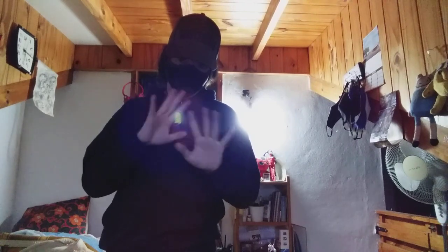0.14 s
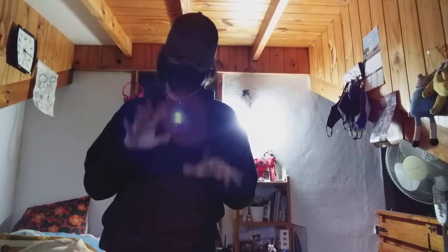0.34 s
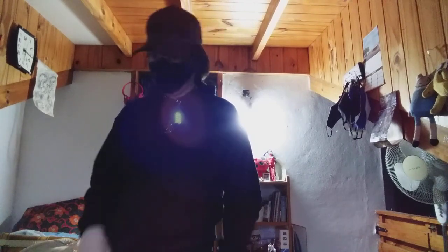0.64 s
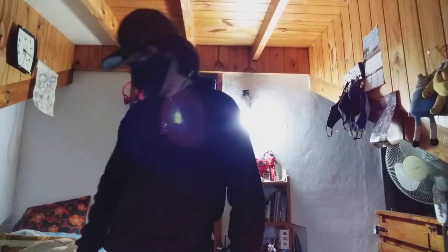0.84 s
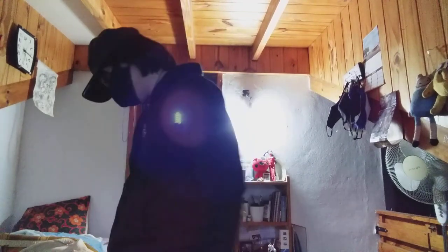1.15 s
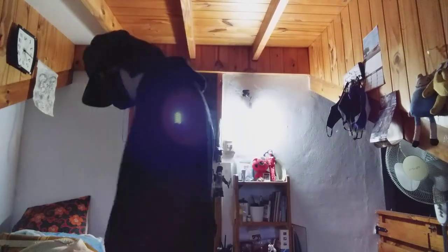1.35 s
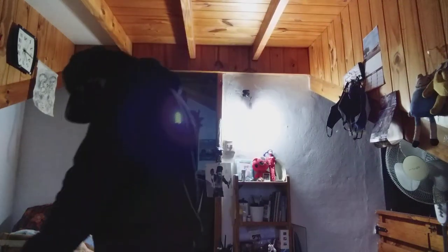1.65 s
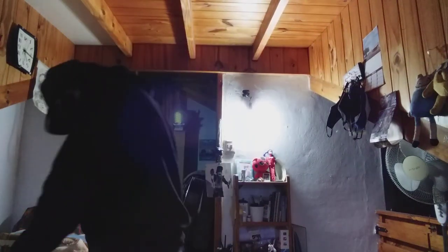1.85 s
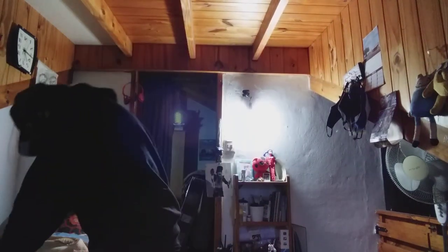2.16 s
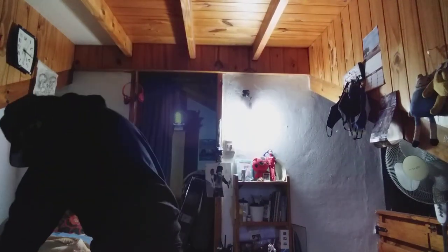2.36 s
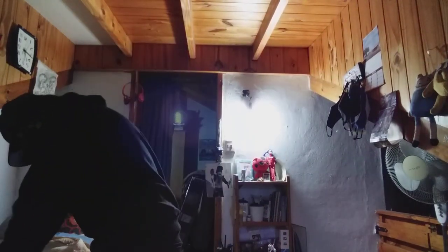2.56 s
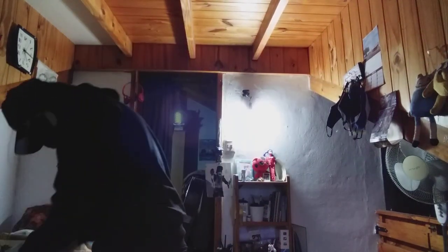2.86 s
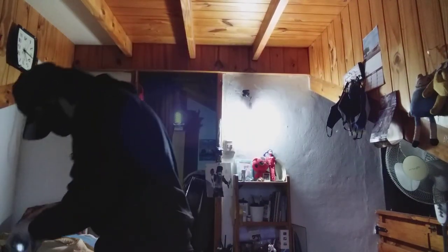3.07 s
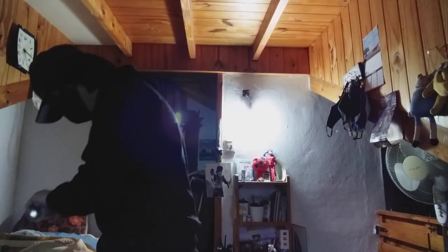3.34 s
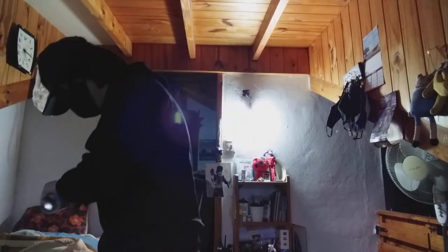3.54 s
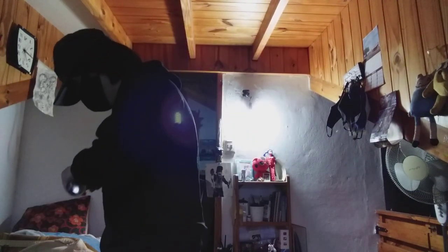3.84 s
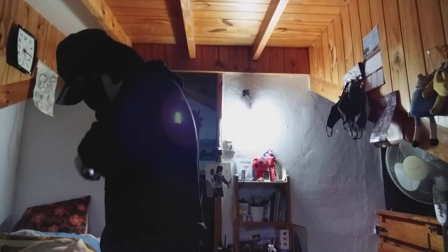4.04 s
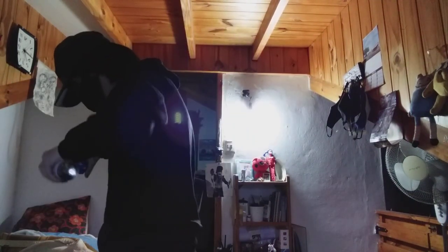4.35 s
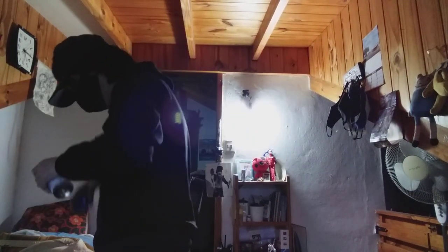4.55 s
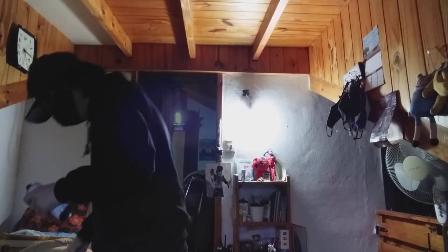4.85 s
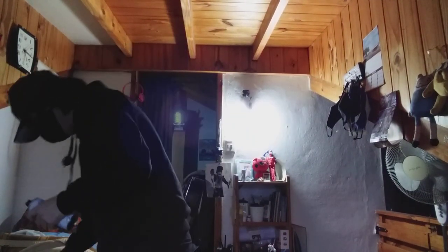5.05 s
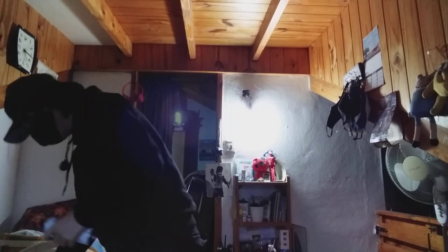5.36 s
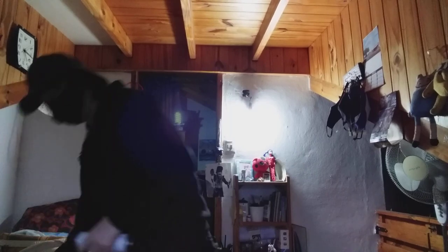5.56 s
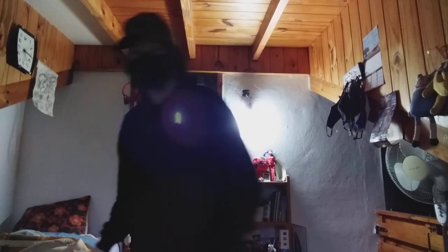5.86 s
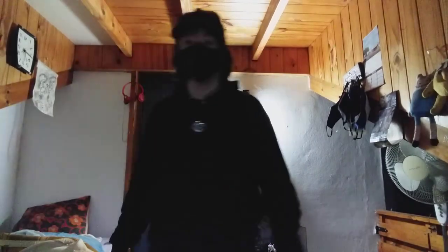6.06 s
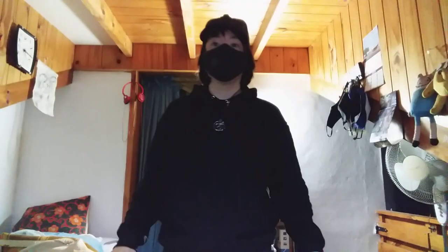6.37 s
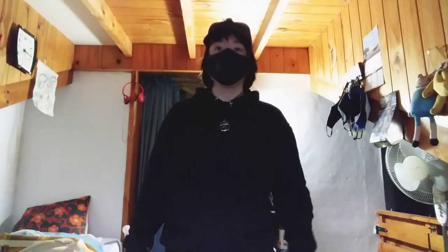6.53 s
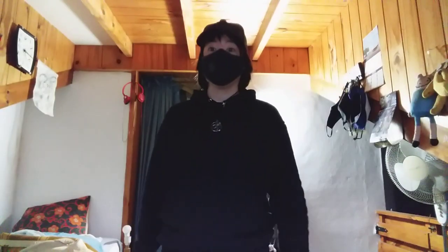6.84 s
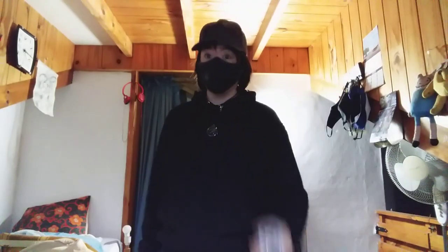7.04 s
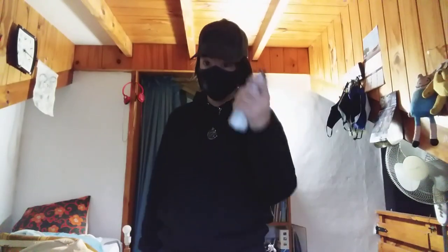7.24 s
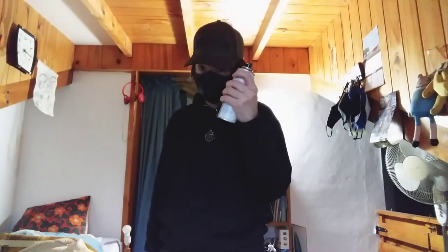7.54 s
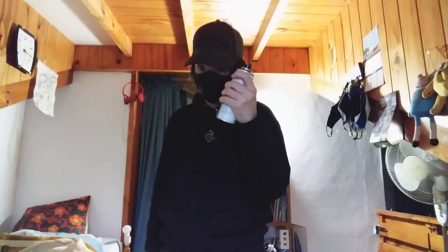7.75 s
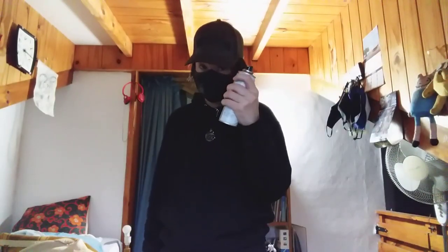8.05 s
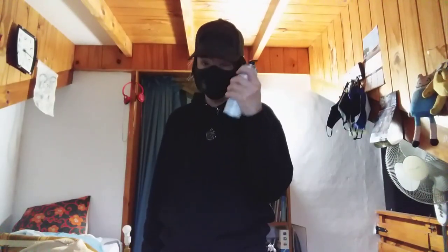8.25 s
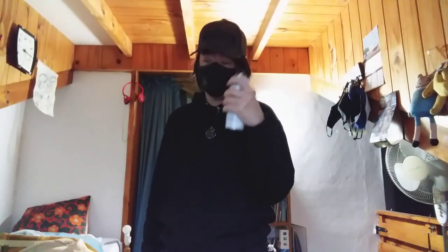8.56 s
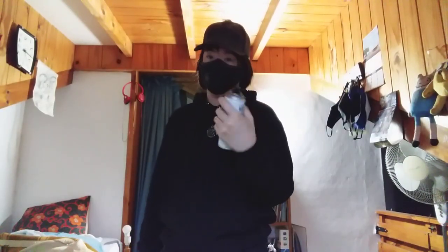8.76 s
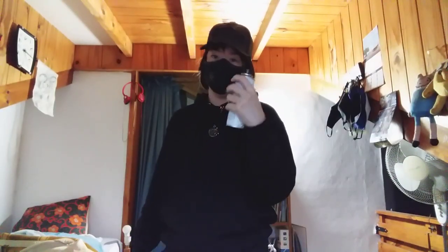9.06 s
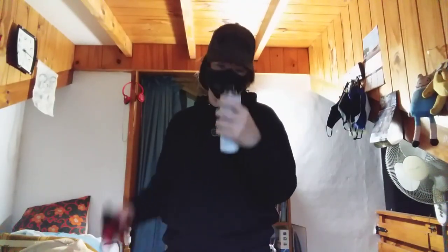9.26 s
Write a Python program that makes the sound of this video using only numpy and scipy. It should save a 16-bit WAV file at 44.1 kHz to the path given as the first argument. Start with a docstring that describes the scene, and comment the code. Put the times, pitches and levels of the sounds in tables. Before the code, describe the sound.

A small, quiet wooden room with faint low rumble, drone and thin hiss. From 0.2 to 2.6 seconds there are only very soft sleeve rustles; from about 1.5 to 3.7 a bird outside gives faint chips, slurred whistles and falling notes, blurred by echoes. At 2.7 a ball begins to tick and roll inside a metal spray-paint can, with brighter taps at 3.3 and lighter ones to 3.9. At 4.2 the can knocks dully on wood amid a loud, sharp burst of clacks, then smaller hollow rattles roll away until 5.0. Near quiet follows, with a tiny rustle at 5.5. At 5.9 a hard clatter starts, continuing as uneven, bright steel rattling with gritty rolling and hollow hum, lively around 7.2 and changing to a lower hollow colour before stopping near 8.0. Faint ticks at 8.5 to 9.0 and soft cloth movements close it.

```python
"""A mixing ball strikes, bounces and rolls in a spray-paint can shaken in bursts in a small, quiet wooden room.
Strikes are noise bursts shaped by shell and gas-space resonances; rolling is gritty noise plus a gas-space hum.
The can knocks once on wood (decaying modes), a sleeve rustles (filtered grains), a bird sings outside (gliding
sines with echoes), a narrow band near 770 Hz swells twice, and rumble, drone and hiss lie underneath."""
import sys
import numpy as np
from scipy import signal
from scipy.fft import rfft, irfft, next_fast_len
from scipy.io import wavfile
from scipy.ndimage import uniform_filter1d, map_coordinates

SR = 44100
rng = np.random.default_rng(int(sys.argv[2]) if len(sys.argv) > 2 else 0)


def log_audio(samples):
    """Write samples as a 16-bit WAV file to the path given in sys.argv[1]."""
    # one column per channel
    frames = np.atleast_2d(samples).T
    # limit to full scale, then quantise
    limited = np.clip(frames, -1, 1)
    pcm = np.round(limited * 32767).astype(np.int16)
    wavfile.write(sys.argv[1], SR, pcm)


N = 414540  # samples

# Ball strikes: start_s, relative_level_db, gas_pitch_hz, gas_ring_db, shell_ring_db, rattle_t60_s
BALL_STRIKES = [(2.6832, -24.5, 2150, -17.5, -9, 0.2), (2.7332, -21.5, 1960, -20, -4.5, 0.15),
                (2.7899, -37.5, 2240, 9.5, -27, 0.17), (2.8374, -34.5, 2250, 1, -26, 0.11),
                (2.8729, -33, 2230, -8.5, -13, 0.17), (2.9125, -44, 2240, -20, -16, 0.19),
                (2.9832, -45, 2250, -2.5, -30, 0.19), (3.2711, -17, 2420, -12.5, -28, 0.14),
                (3.3087, -28.5, 2070, -7, -10, 0.21), (3.3266, -16, 2590, -10, -30, 0.11),
                (3.3685, -25.5, 1960, -16, -27, 0.19), (3.7657, -36, 1890, 1, -15, 0.195),
                (3.8081, -25.5, 1750, -10.5, -23.5, 0.19), (3.906, -54, 1090, -29, -34.5, 0.19),
                (3.9376, -41, 1240, -10.5, -29, 0.18), (4.2352, -16.5, 1260, -18, -16, 0.13),
                (4.2931, -14.5, 1250, -11.5, -11, 0.17), (4.3161, 0, 2700, -25, -7, 0.15),
                (4.3224, -12.5, 1140, -24.5, -15, 0.19), (4.3277, -8, 2180, -21, -13.5, 0.22),
                (4.342, -10.5, 1140, -7.5, -13.5, 0.14), (4.3974, -8, 1380, -6, -15, 0.13),
                (4.444, -18, 1320, -14.5, -16, 0.21), (4.597, -24.5, 1750, -13, -7.5, 0.16),
                (4.6304, -29, 1810, -8.5, -20, 0.18), (4.6622, -37, 1780, -14.5, -8, 0.164),
                (4.6913, -23, 1770, -5, -33, 0.12), (4.7729, -25, 1800, -23, -22, 0.22),
                (4.8343, -27.5, 1820, -14.5, -31, 0.19), (4.8676, -27.5, 1810, -7.5, -20, 0.19),
                (4.9088, -43.5, 1810, -17, -7, 0.192), (4.9486, -29, 1840, -11.5, -24, 0.15),
                (4.974, -33, 1830, -3.5, -24, 0.24), (5.4436, -48.5, 1290, -8, -25.5, 0.26),
                (5.6715, -34, 1060, -11.5, -17, 0.12), (5.7535, -55, 1060, -10, -13.5, 0.19),
                (5.9374, -8, 1910, -13.5, -3, 0.11), (5.9424, -4, 1950, -26.5, -8, 0.14),
                (5.9471, -5, 2140, -13.5, 0, 0.12), (5.96, -22, 2040, -22.5, -12.5, 0.21),
                (6.0009, -21.5, 1970, -3.5, -22.5, 0.2), (6.0424, -19, 2320, -19, -7, 0.22),
                (6.0621, -10.5, 2060, -23.5, -12, 0.16), (6.101, -14, 2060, -18.5, -19.5, 0.16),
                (6.124, -23.5, 1950, -9.5, -26, 0.1), (6.2449, -28, 1910, -18.5, -10, 0.24),
                (6.4048, -21.5, 1910, -11.5, 1, 0.26), (6.4318, -20, 2060, -13, -15, 0.25),
                (6.4717, -10.5, 2500, -38, -14.5, 0.17), (6.5186, -22, 1780, -31, -8.5, 0.13),
                (6.6371, -24.5, 1680, -39, -6, 0.27), (6.6807, -35.5, 1550, -8, -15, 0.19),
                (6.6956, -18.5, 1710, -14.5, -2, 0.25), (6.7451, -15, 1910, -13.5, -10.5, 0.15),
                (6.7845, -19, 1910, -23, -8, 0.17), (6.8043, -15.5, 1680, -16.5, -16.5, 0.34),
                (6.8654, -27.5, 1710, -12, -24, 0.14), (6.9112, -34, 1580, -1.5, -8.5, 0.19),
                (6.9927, -39.5, 1510, -14.5, -24, 0.32), (7.0494, -14.5, 2140, -12, -5.5, 0.34),
                (7.0671, -13.5, 2170, -13, -8.5, 0.28), (7.1967, -9, 2600, -29, -3, 0.15),
                (7.2149, -24, 2090, -4, -17, 0.19), (7.2295, -15, 2030, -16, -8, 0.2),
                (7.2352, -24, 1980, -11.5, -1.5, 0.19), (7.2633, -10, 2570, -28, -10.5, 0.19),
                (7.2903, -26, 1730, -12, -26, 0.21), (7.323, -27.5, 2020, -19.5, -28, 0.1),
                (7.3413, -26, 2120, -11.5, -27, 0.28), (7.3692, -14, 1210, -17.5, -23.5, 0.13),
                (7.398, -24, 1330, -16.5, -17, 0.084), (7.429, -30, 1250, -7, -7, 0.16),
                (7.5453, -13, 1980, -15, -8.5, 0.14), (7.5557, -22, 1170, -9, -14, 0.15),
                (7.601, -27, 1050, -16, -4.5, 0.16), (7.6505, -21, 1050, -15.5, -34, 0.11),
                (7.6975, -21.5, 2480, -9, -30, 0.17), (7.7109, -19.5, 1000, -8.5, -21.5, 0.16),
                (7.7314, -27.5, 1060, -11, -13, 0.21), (7.7533, -28.5, 2440, -5, -24, 0.14),
                (7.7912, -36, 2530, -7.5, -30, 0.175), (7.8216, -17.5, 1280, -15, -30, 0.19),
                (7.8394, -15, 1250, -20.5, -18, 0.11), (7.8724, -18.5, 1240, -20.5, -41, 0.22),
                (7.9079, -30, 1120, -14.5, -37, 0.19), (7.9449, -27, 2040, -21, -18.5, 0.2),
                (7.9726, -36.5, 2490, -11, -18, 0.22), (8.4503, -59, 1030, -19, -8, 0.19),
                (8.509, -36.5, 1060, -5.5, -3, 0.216), (8.5485, -31.5, 1280, -12, -23, 0.24),
                (8.5686, -39, 2550, -10.5, -12.5, 0.177), (8.761, -53.5, 1190, -31, -8, 0.43),
                (8.962, -63.5, 1170, 1.5, -8, 0.32)]
# Hold on the can, from each time on: start_s, thud_db (for a middling blow), wall_db, dome_db, treble_db, gas_width_hz
CAN_GRIPS = [(2.6, -27, -6.5, -30, -35.5, 250), (2.78, -13, -7, -11.5, -19.5, 200),
             (3.2, -16.5, -17, -19, -22, 400), (3.7, -17, -12, -14, -14, 298),
             (4.2, -16, -11, -18.5, -23.5, 220), (4.55, -14, -5.5, -11.5, -15.5, 270),
             (5.4, -33.5, -6, -27, -50, 592), (5.9, -22.5, -13.5, -14.5, -23.5, 272),
             (6.35, -36, -15.5, -21, -41, 268), (6.6, -30, -12, -9.5, -24.5, 355),
             (7.02, -25, -13, -18.5, -19.5, 250), (7.19, -26, -9, -14.5, -25.5, 300),
             (7.36, -34, -15, -16.5, -26, 513), (7.52, -12.5, -11, -29, -20, 1200),
             (7.63, -24, -13, -41, -18.5, 1220), (7.81, -27, -13, -29, -22, 1000),
             (8.4, -42, -6, -20.5, -16, 602), (8.7, -40.5, -33, 5, -11.5, 498),
             (8.9, -21, -14, -20.5, -30, 500)]
# Shell wall modes: pitch_hz, width_hz, gain_db
SHELL_MODES = [(5400, 600, 2), (5780, 300, 5), (6410, 380, -6.5)]
# Bright treble of the strikes and rolling: frequency_hz, gain_db
TREBLE_COLOUR = [(5060, -27), (8600, -14), (9130, -25), (9910, -5.5), (11900, 6.5), (13700, -6.5),
                 (15100, -2.5), (15600, -4.5)]
# Steel clack: frequency_hz, gain_db
BODY_COLOUR = [(180, -48), (300, -1.5), (535, -30), (696, -36), (953, 4.5), (2830, 6), (4490, -20.5),
               (7140, 6), (8420, -18.5), (12700, -28), (15500, -23.5)]
MIDDLING_DB = -21.5  # relative_level_db of a middling blow
THUD_LAG_DB_PER_DB = 0.61  # thud drop per dB of harder blow
SCATTER_DB = 3  # random colour spread from strike to strike
CRACK_DB, CHATTER_DB = 3, -5.5  # first contact, rattle after it
CRACK_T60_S = 0.0025
STRAY_BOUNCES_PER_S = 70


def can_response(f, thud_db, gas_hz, gas_db, gas_width_hz, wall_db, shell_db, dome_db, treble_db, luck):
    """Can as a minimum-phase filter: power sum of clack, thud, gas, wall, shell, dome and treble."""
    parts = [
        amp(-18.5) * along(BODY_COLOUR, f),
        amp(thud_db + 15) * resonance(f, 940, 1200) ** 2,
        amp(gas_db + 17.5) * resonance(f, gas_hz, gas_width_hz),
        amp(wall_db + 9) * resonance(f, 3700, 2800) ** 2,
        amp(shell_db + 12.5) * modes(f, SHELL_MODES),
        amp(dome_db + 14) * resonance(f, 7400, 900) ** 2,
        amp(treble_db + 8) * along(TREBLE_COLOUR, f),
    ]
    power = sum(np.abs(part) ** 2 for part in parts)
    ripple_db = 3.5 * np.array([np.interp(f, np.linspace(0, SR / 2, len(row)), row) for row in luck])
    return causal(np.sqrt(power) * amp(ripple_db))


def strikes():
    """Each blow is a sharp crack, then chatter and room answer dying away, coloured by the can."""
    start_s, level_db, gas_hz, gas_db, shell_db, t60_s = np.transpose(BALL_STRIKES)[:, :, None]
    grips = np.array(CAN_GRIPS)
    grip = grips[np.searchsorted(grips[:, 0], start_s[:, 0]) - 1]
    scatter_db = SCATTER_DB * rng.standard_normal((len(start_s), 4))
    thud_db, wall_db, dome_db, treble_db = (grip[:, 1:5] + scatter_db).T[:, :, None]
    thud_db = thud_db - THUD_LAG_DB_PER_DB * (level_db - MIDDLING_DB)
    gas_width_hz = grip[:, 5:]

    t = np.arange(int(0.3 * SR)) / SR
    shape = (len(start_s), len(t))
    click = (t == 0) * 4
    crack = (rng.standard_normal(shape) * 0.3 + click) * amp(CRACK_DB - 60 * t / CRACK_T60_S)

    dying = amp(-60 * t / np.clip(t60_s, 0.03, 0.6)) + 0.4 * amp(-60 * t / 0.02)
    # stray bounces stand out of the dense chatter
    bounces = (rng.random(shape) < STRAY_BOUNCES_PER_S / SR) * rng.normal(0, 6, shape)
    chatter = (gritty(shape, spike_db=-1) + bounces) * amp(CHATTER_DB) * dying

    luck = rng.standard_normal((len(start_s), 80))  # each blow wakes the small wall modes at new strengths

    def can(f):
        """This set of blows through the can."""
        return can_response(f, thud_db, gas_hz, gas_db, gas_width_hz, wall_db, shell_db, dome_db, treble_db, luck)

    hits = amp(level_db - 6.5) * filtered(crack + chatter, can)
    out = np.zeros(N + len(t))
    for start, hit in zip(np.round(start_s[:, 0] * SR).astype(int), hits):
        out[start:start + len(t)] += hit
    return out[:N]


# Ball rolling in paint, one list per spell: time_s, scrape_db, hum_over_scrape_db, hum_pitch_hz
ROLL_SPELLS = [
    [(2.66, -74, -3, 2176), (2.72, -49, 0, 2150), (2.8, -54.5, -1, 2220), (3.0, -55, 5, 2218),
     (3.06, -69.5, 0, 2158), (3.24, -61, -7, 2221), (3.4, -56.5, -45, 2061), (3.5, -66, 9, 2162)],
    [(3.5, -63.5, 0, 2140), (3.72, -70, -4, 2155), (3.82, -56.5, 18.5, 1744), (3.96, -63, -25, 1300),
     (4.02, -81, -10, 1311), (4.15, -94, -9, 1247)],
    [(4.22, -86, -1, 1236), (4.3, -71, -3, 1238), (4.36, -44, 6.5, 1200), (4.41, -38, 7.5, 1400),
     (4.45, -44, 0, 1320), (4.5, -50, -1.5, 1689), (4.6, -63, 4, 1701), (4.7, -58, 24.5, 1800),
     (4.79, -64, -13, 1772), (4.88, -49, 10.5, 1804), (4.98, -61, -12.5, 1773), (5.055, -60, -12, 1710),
     (5.11, -77.5, -7.5, 1700)],
    [(5.4, -91.5, -6, 1311), (5.47, -65.5, 15, 1281), (5.51, -73.5, -1.5, 1208), (5.64, -68, 5, 1100),
     (5.74, -68, -4, 1095), (5.8, -62, -10, 1950), (5.92, -60, 5.5, 1969), (6.0, -47.5, -11, 2040),
     (6.12, -41, 3.5, 1988), (6.24, -52.5, -9.5, 1884), (6.34, -64, -1, 1958), (6.46, -56.5, -10, 2000),
     (6.54, -53, -22, 1837), (6.62, -75.5, -1, 1600)],
    [(6.62, -70.5, -5, 1595), (6.67, -53, 4.5, 1611), (6.74, -58.5, 9, 1890), (6.83, -37.5, -2.5, 1760),
     (6.93, -52.5, 11.5, 1570), (7.02, -53, -15, 1700), (7.07, -46.5, 10, 2166), (7.13, -42.5, -3, 2296),
     (7.19, -56, -4, 2050), (7.3, -57, -4, 2000), (7.45, -53.5, 7, 1270), (7.52, -69.5, -6, 1270)],
    [(7.52, -57.5, -13, 1270), (7.58, -34, -8, 1223), (7.64, -66, -2, 1150), (7.73, -44.5, -25, 1150),
     (7.8, -89, -10, 1200), (7.88, -48.5, -17, 1180), (8.025, -56.5, -3, 1224), (8.08, -83.5, -10, 1200),
     (8.3, -85, -4.5, 1200), (8.7, -88.5, -20, 1200)],
]
# Scrape on the wall: frequency_hz, gain_db
SCRAPE_COLOUR = [(290, -30), (500, -7), (671, -14), (1090, -6), (1210, -17.5), (2000, -11), (3170, -11),
                 (7380, -10.5), (8300, -25.5), (10800, -83), (18300, -120)]
TREBLE_DB = -15  # treble over scrape
TICKS_PER_S, TICK_DB, TICK_T60_S = 67, -8.5, 0.02  # ball skips; level over the grit


def roll():
    """The rolling ball scrapes the wall, a bright treble layer joins, the gas space hums at its moving pitch."""
    speed, hum_db = np.zeros(N), np.zeros(N)
    for spell in ROLL_SPELLS:
        speed += amp(curves(spell, silent=-120)[0])
        hum_db += curves(spell, silent=0)[1]
    gas_hz = curves(np.concatenate(ROLL_SPELLS))[2]

    skips = (rng.random(N) < TICKS_PER_S / SR) * amp(rng.normal(0, 5, N))
    tick = amp(-60 * np.arange(SR // 20) / SR / TICK_T60_S)
    skipping = unit(np.convolve(skips, tick)[:N])
    grit = patchy(gritty(N, spike_db=4) * (1 + amp(TICK_DB) * skipping), depth_db=2.8)
    scrape = unit(filtered(grit, lambda f: along(SCRAPE_COLOUR, f) + amp(-24.5) * abs(modes(f, SHELL_MODES))))
    treble = unit(filtered(grit, lambda f: along(TREBLE_COLOUR, f)))

    # slow noise on both quadratures makes a narrow band around the gas pitch
    flutter = filtered(rng.standard_normal((2, N)), lambda f: 1 / (1 + (f / 165) ** 2))
    phase = 2 * np.pi * np.cumsum(gas_hz) / SR
    tone = flutter[0] * np.cos(phase) + flutter[1] * np.sin(phase)
    hum = unit(tone * (1 + skipping))

    bumps_db = 1.8 * wobble(30)  # uneven wall contact
    return amp(bumps_db) * speed * (scrape + amp(TREBLE_DB) * treble + amp(hum_db) * hum)


# Can on wood: start_s, level_db
WOOD_KNOCK = (4.2335, -16)
# Wood modes: pitch_hz, relative_level_db, t60_s
WOOD_MODES = [(190, -7, 0.1), (388, -10, 0.15), (501, -4, 0.092), (766, -15, .07), (1280, -20.5, 0.037)]


def knock():
    """The can's base knocks wood: short modes in a dull puff."""
    start_s, level_db = WOOD_KNOCK
    t = np.arange(SR // 4) / SR
    ring = sum(amp(db - 60 * t / t60_s) * np.sin(2 * np.pi * hz * t) for hz, db, t60_s in WOOD_MODES)
    dull = unit(filtered(rng.standard_normal(len(t)), lambda f: resonance(f, 450, 650) ** 2))
    puff = dull * amp(-2.5 - 60 * t / 0.11)
    onset = 1 - np.exp(-t / 0.003)
    out = np.zeros(N)
    out[round(start_s * SR):][:len(t)] = amp(level_db) * (ring + puff) * onset
    return out


# Sleeve movements: start_s, length_s, swish_db, scuff_db
SLEEVE_MOVES = [(.17, 0.074, -76, -78), (0.625, 0.26, -77.5, -89), (0.856, .06, -77, -85),
                (0.952, 0.24, -81.5, -96), (1.205, .07, -69.5, -70), (1.308, 0.094, -72, -73.5),
                (1.673, 0.069, -80, -84), (1.91, 0.04, -80, -70.5), (2.01, 0.042, -75, -92),
                (2.28, 0.13, -70.5, -93), (2.469, 0.14, -68, -77), (5.124, 0.034, -86, -89),
                (5.198, 0.027, -78, -97.5), (5.32, 0.041, -79.5, -80.5), (5.531, 0.023, -60, -57.5),
                (8.02, 0.24, -87.5, -92), (8.193, 0.049, -76.5, -84), (8.32, .1, -78.5, -89.5),
                (8.44, 0.055, -76.5, -77), (8.748, 0.077, -82.5, -86.5), (8.948, 0.043, -74, -74),
                (9.054, 0.25, -82.5, -90), (9.352, 0.064, -76.5, -72.5)]
# Bright swish: frequency_hz, gain_db
SWISH_COLOUR = [(1350, -39), (2300, -27.5), (2560, -31), (2720, -11.5), (3230, -21), (4060, -10.5),
                (5580, -18), (6910, -14), (7780, -17), (8300, -53), (10800, -83), (18300, -120)]
# Duller scuff: frequency_hz, gain_db
SCUFF_COLOUR = [(400, -12), (650, -7), (800, -8.5), (1150, -6), (1700, -6), (2600, -13.5), (4000, -46)]
RUSTLE_ATTACK_S, RUSTLE_RELEASE_S = 0.017, 0.053


def sleeve():
    """Soft cloth friction as the arm moves: a bright swish over a duller scuff, from the same grains."""
    swish_level, scuff_level = np.zeros(N), np.zeros(N)
    for start_s, length_s, swish_db, scuff_db in SLEEVE_MOVES:
        move = gesture(start_s, length_s, RUSTLE_ATTACK_S, RUSTLE_RELEASE_S)
        swish_level += amp(swish_db) * move
        scuff_level += amp(scuff_db) * move
    fibres = patchy(gritty(N, spike_db=2.5), depth_db=1.8)
    swish = unit(filtered(fibres, lambda f: along(SWISH_COLOUR, f)))
    scuff = unit(filtered(fibres, lambda f: along(SCUFF_COLOUR, f)))
    return swish_level * swish + scuff_level * scuff


# Chip shape, a fall then a peak: after_start_s, pitch_hz, relative_level_db
CHIP_SHAPE = [(0, 4717, -16), (.006, 2946, 5.5), (.012, 2570, -6), (0.015, 3120, 8.5), (0.023, 4020, 2.5),
              (.026, 2843, 7.5), (.04, 2380, -1.5), (.067, 2615, -24)]
# Chips sung: start_s, relative_level_db
CHIPS_SUNG = [(1.672, -55), (2.005, -50.5), (2.349, -52)]
# Long note shapes: length_share, base_pitch_hz, relative_level_db
SLUR_SHAPE = [(0, 2682, -17), (.14, 2870, -6), (.4, 2145, -7.5), (.54, 2330, -15), (.66, 2500, 2),
              (.8, 2482, -19), (1, 2460, -28)]
FALL_SHAPE = [(0, 5550, -23), (.3, 5100, -7), (.62, 4550, 6), (.85, 4200, -10), (1, 4000, -28)]
LOW_SHAPE = [(0, 2150, -15), (.6, 2166, 4.5), (1, 2200, -29)]
# Long notes sung: start_s, length_s, pitch_ratio, relative_level_db
SLURS_SUNG = [(1.45, .17, .92, -62.5), (1.771, 0.17, 1.015, -50), (2.109, 0.17, .99, -50),
              (2.447, 0.18, 0.99, -49)]
FALLS_SUNG = [(2.767, 0.042, .99, -51.5), (2.883, .07, 0.98, -46.5), (3.011, .066, 1.01, -48.5),
              (3.14, 0.087, 1.01, -47.5)]
LOWS_SUNG = [(3.11, 0.15, 1.01, -57), (3.499, 0.088, 0.97, -53.5), (3.63, .12, 1.01, -55.5)]


def bird():
    """Whistles with a flutter, blurred by echoes outside."""
    chips = [np.array(CHIP_SHAPE) + [start_s, 0, db] for start_s, db in CHIPS_SUNG]
    long_notes = []
    for shape, sung in ((SLUR_SHAPE, SLURS_SUNG), (FALL_SHAPE, FALLS_SUNG), (LOW_SHAPE, LOWS_SUNG)):
        for start_s, length_s, pitch_ratio, db in sung:
            long_notes.append(np.array(shape) * [length_s, pitch_ratio, 1] + [start_s, 0, db])

    song, quaver = np.zeros(N), 1 + 0.027 * wobble(280)
    # long notes turn more roundly
    for notes, smooth_samples in ((chips, 60), (long_notes, 500)):
        for note in notes:
            pitch_hz, level_db = curves(note)[0], curves(note, silent=-120)[1]
            glide_hz = uniform_filter1d(pitch_hz, size=smooth_samples)
            phase = 2 * np.pi * np.cumsum(glide_hz * quaver) / SR
            song += np.sqrt(2) * amp(level_db) * np.sin(phase)

    for start_s, db in CHIPS_SUNG:  # each chip opens with a harsh, breathy burst
        burst = unit(filtered(rng.standard_normal(N), lambda f: resonance(f, 3020, 1450) ** 2))
        song += amp(db - 6) * gesture(start_s, 0.029, 0.002, 0.0092) * burst
    song *= amp(-0.5 + 1.2 * wobble(90))

    t = np.arange(SR // 2) / SR
    echoes = rng.standard_normal(len(t)) * (amp(-60 * t / 0.075) + 0.13 * amp(-60 * t / 0.37))
    blurred = signal.fftconvolve(song, echoes / np.linalg.norm(echoes))[:N]
    return song + amp(-1.5) * blurred


# Faint band swells: start_s, length_s, level_db
BAND_SWELLS = [(1.98, 0.052, -69.5), (3.05, 0.13, -73.5)]


def swell():
    """Narrow noise near 770 Hz that swells twice."""
    level = sum(amp(db) * gesture(start_s, length_s, 0.041, 0.091) for start_s, length_s, db in BAND_SWELLS)
    return level * unit(filtered(rng.standard_normal(N), lambda f: resonance(f, 770, 120) ** 2))


# Low background rumble and drone, dipping after loud bursts: time_s, deep_db, drone_db
LOW_LEVELS = [(0.0, -68, -63.5), (2.15, -68, -67.5), (2.75, -70, -64.5), (4.08, -67.5, -70.5),
              (4.42, -69.5, -65), (4.84, -65, -66.5), (5.23, -73.5, -75), (6.02, -67.5, -63),
              (6.47, -67, -68.5), (6.86, -65.5, -67.5), (8.98, -65.5, -65), (9.4, -65, -68.5)]
# Background hiss, its level sinking around the loud bursts: time_s, level_db
HISS_LEVELS = [(0, -77), (2.6, -75), (3.102, -77), (4.1, -76), (5.2, -79.5), (5.8, -84.5), (6.6, -85),
               (8.1, -76), (8.4, -79.5), (9.4, -76)]
# Deep rumble: frequency_hz, gain_db
DEEP_COLOUR = [(15, -65), (25, -32), (32, -36.5), (47, -19), (62, 2), (81, 0), (120, -7), (160, -35),
               (260, -120)]
# Drone: frequency_hz, gain_db
DRONE_COLOUR = [(65, -38), (110, -5.5), (144, -5.5), (183, 2), (209, -8), (243, -4), (327, -14),
                (377, -8.5), (438, -18), (789, -36.5), (900, -24), (1170, -54.5), (1980, -120)]
# Hiss: frequency_hz, gain_db
HISS_COLOUR = [(350, -32), (600, -5), (997, -10.5), (1130, -5), (1570, -11.5), (4340, -12.5), (5630, -14.5),
               (6640, -19), (16000, -15)]


def background():
    """Lumpy low rumble and drone with faint hiss, each filtered noise following its level table."""
    levels = curves(LOW_LEVELS) + curves(HISS_LEVELS)
    colours, lumps_db = (DEEP_COLOUR, DRONE_COLOUR, HISS_COLOUR), (1.5, 1.5, 0.4)
    out = np.zeros(N)
    for level_db, colour, lump_db in zip(levels, colours, lumps_db):
        noise = unit(filtered(rng.standard_normal(N), lambda f: along(colour, f)))
        out += amp(level_db + lump_db * wobble(8.9)) * noise
    return out


def amp(db):
    """Gain of a level in dB."""
    return 10 ** (np.asarray(db) / 20)


def unit(x):
    """Scaled to rms 1."""
    return x / np.sqrt(np.mean(np.abs(x) ** 2, axis=-1, keepdims=True) + 1e-20)


def along(points, hz):
    """Gain interpolated through (Hz, dB) points on a log frequency axis."""
    f, db = np.transpose(points)
    return amp(np.interp(np.log(hz + 1), np.log(f + 1), db))


def curves(rows, silent=None):
    """One value per sample for each column after the time; silent is the value outside the rows."""
    time_s, *columns = np.transpose(rows)
    return [np.interp(np.arange(N) / SR, time_s, column, silent, silent) for column in columns]


def wobble(knots_per_s):
    """A smooth random curve."""
    knots = rng.standard_normal(int(N * knots_per_s / SR) + 4)
    return map_coordinates(knots, [np.arange(N) * knots_per_s / SR])


def gesture(start_s, length_s, attack_s, release_s):
    """Rises from the start, holds until the length is over, dies away."""
    t = np.arange(N) / SR - start_s
    return np.clip(t / attack_s, 0, 1) ** 2 * np.exp(-np.clip(t - length_s, 0, None) / release_s)


def gritty(shape, spike_db):
    """Noise whose samples come in short grains of uneven size."""
    size = amp(spike_db * np.minimum(rng.exponential(size=shape), 4))
    return unit(rng.standard_normal(shape) * uniform_filter1d(size, size=12, axis=-1))


def patchy(x, depth_db):
    """Random patches of gain over time and frequency."""
    z = signal.stft(x, nperseg=256)[2]
    field = uniform_filter1d(rng.standard_normal(z.shape), size=3, axis=0)
    field = uniform_filter1d(field, size=40, axis=1)
    return unit(signal.istft(z * amp(depth_db * field / field.std()), nperseg=256)[1][:N])


def filtered(x, response):
    """x through a complex frequency response, zero-padded."""
    m = 2 * next_fast_len(x.shape[-1] // 2 + 1024)
    return irfft(rfft(x, m) * response(np.fft.rfftfreq(m, 1 / SR)), m)[..., :x.shape[-1]]


def resonance(f, hz, width_hz):
    """Causal resonance of peak gain 1."""
    return 1j * f * width_hz / (hz * hz - f * f + 1j * f * width_hz)


def modes(f, table):
    """Sum of resonances with alternating sign."""
    return sum((-1) ** k * amp(db) * resonance(f, hz, width_hz) for k, (hz, width_hz, db) in enumerate(table))


def causal(gain):
    """Minimum-phase responses with these gains, by folding the cepstrum."""
    cepstrum = irfft(np.log(gain + 1e-6))
    half = cepstrum.shape[-1] // 2
    cepstrum[..., 1:half] *= 2
    cepstrum[..., half + 1:] = 0
    return np.exp(rfft(cepstrum))


def scene():
    """All sources at one microphone."""
    can = strikes() + roll() + knock()
    return (can + sleeve() + bird() + swell() + background())[None]


TOP_HZ = 15800


def record(dry):
    """The input stage rounds off the hardest cracks; nothing passes above the band limit."""
    rounded = dry / (1 + np.abs(dry / 0.75) ** 4) ** (1 / 4)
    return filtered(rounded, lambda hz: hz < TOP_HZ)


dry = scene()
out = record(dry)
log_audio(out)
```